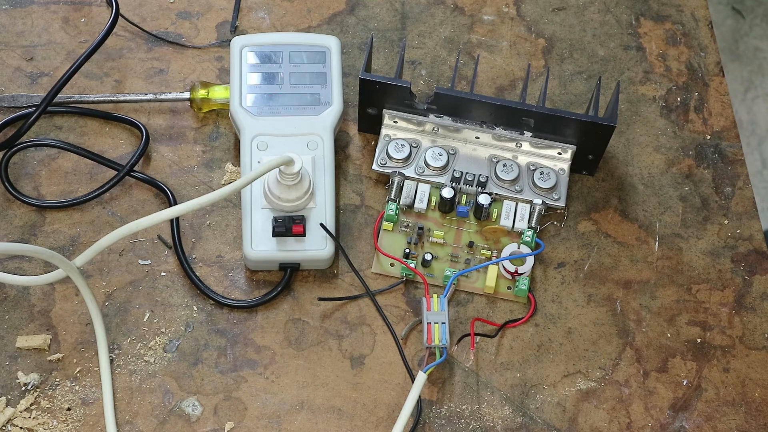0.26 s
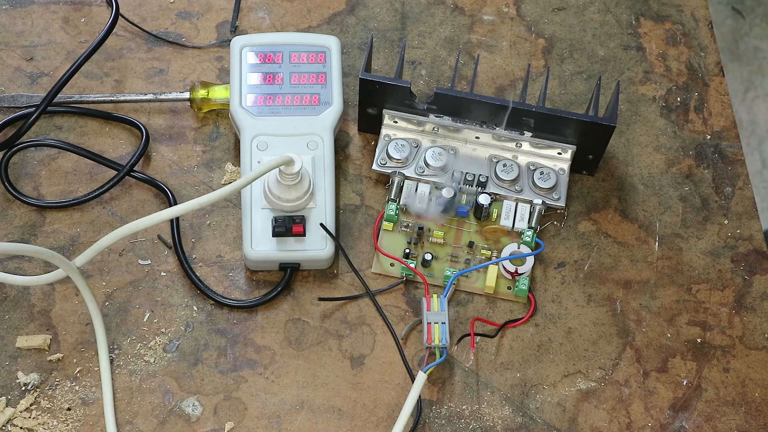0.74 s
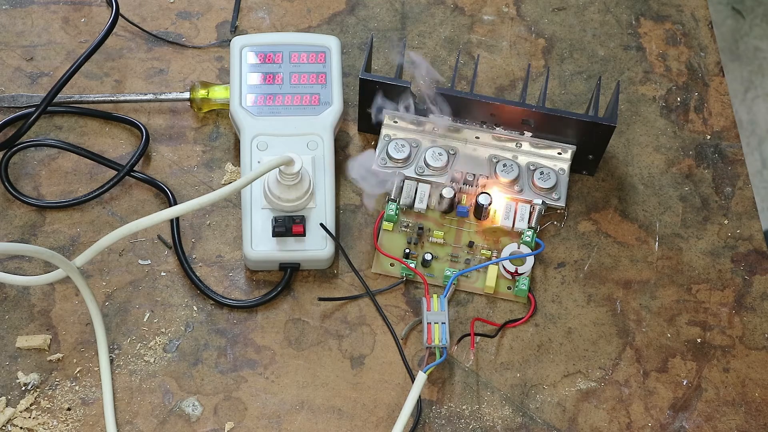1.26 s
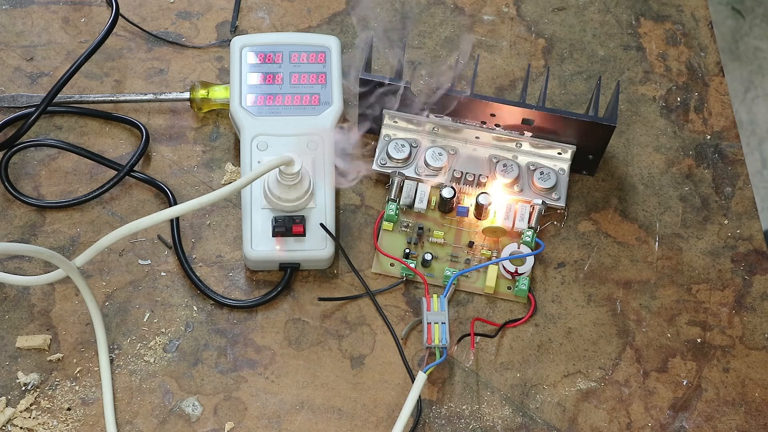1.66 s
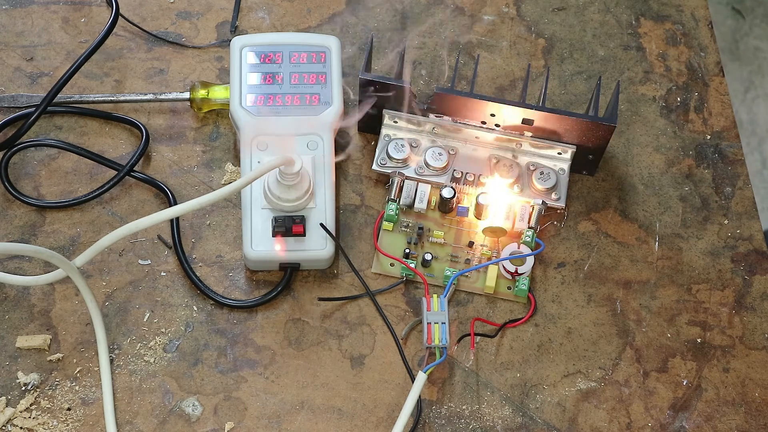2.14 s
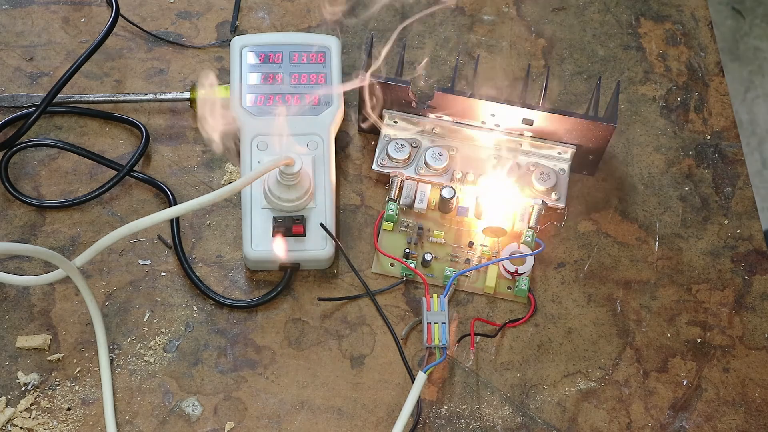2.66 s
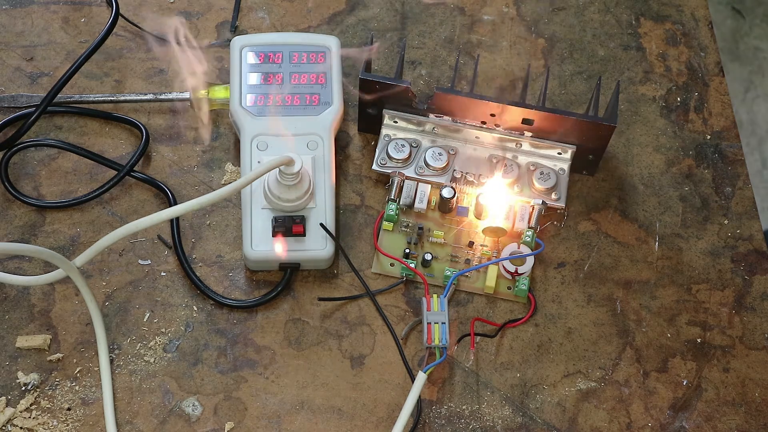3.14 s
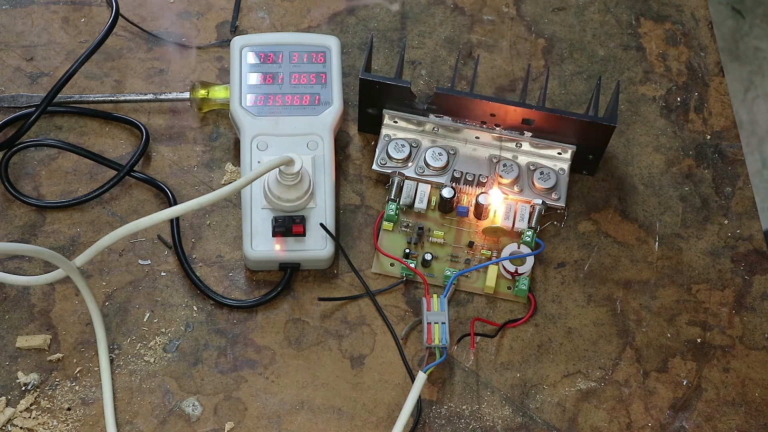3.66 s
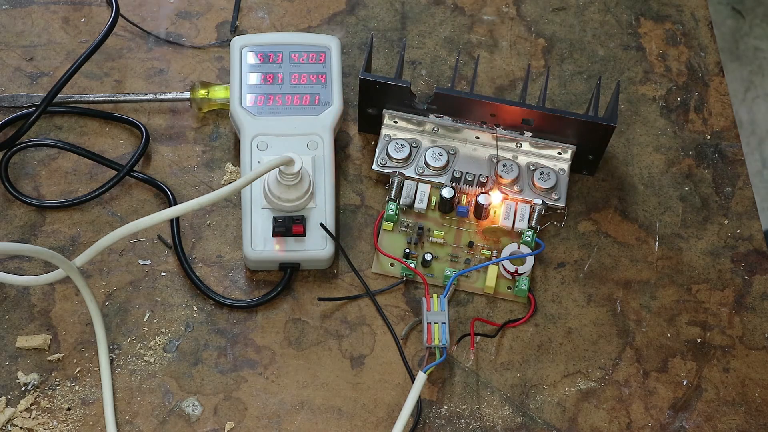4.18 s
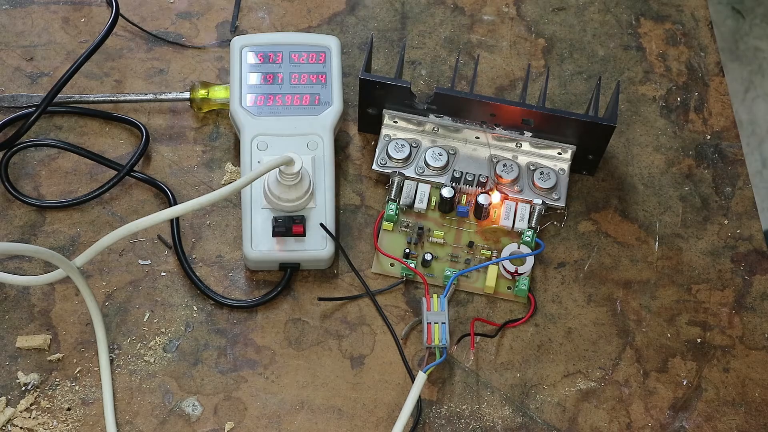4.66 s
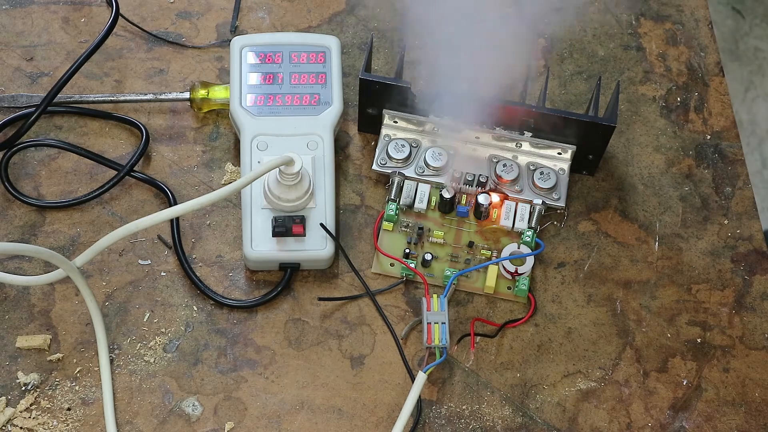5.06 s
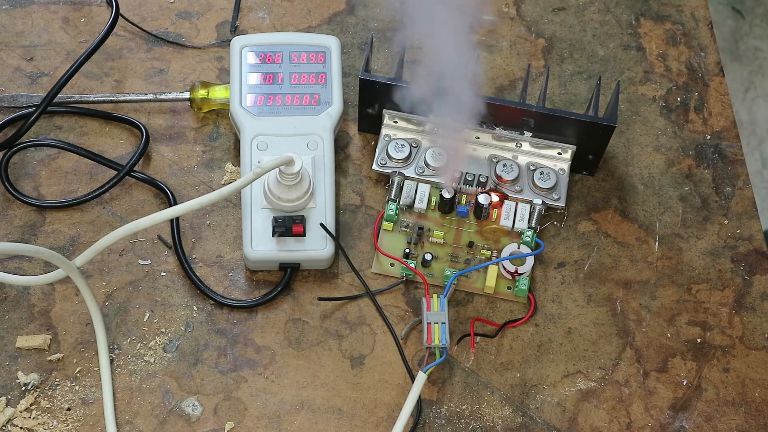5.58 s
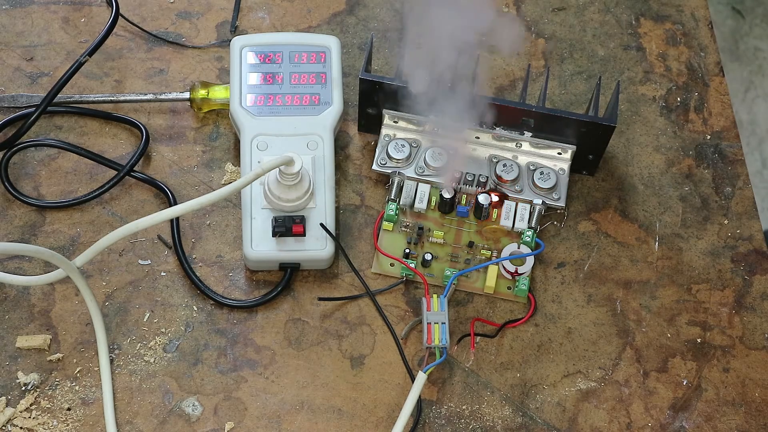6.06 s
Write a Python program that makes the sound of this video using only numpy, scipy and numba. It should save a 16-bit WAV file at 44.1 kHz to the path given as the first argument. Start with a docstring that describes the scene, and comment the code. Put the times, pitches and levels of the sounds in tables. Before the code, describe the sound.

Quiet room hiss, then buzzing electrical sizzle and snapping pops, a lull with soft flame hum, a brief whistle, and one violent explosive crack.

```python
"""Amplifier board burning on a workshop bench

Close and central on a wooden bench in a small workshop, a part sizzles on the mains peaks and pops as gas breaks out.
Filtered noise makes its flame, which sinks to a low fluttering hum; a capacitor whistles (a wavering sine) and bursts.
The bang, a shock with debris and a push of gas, leaves the heat sink ringing in decaying sines.
It overloads the microphone's gain control, which ducks and slowly recovers; rumble and hiss lie wide behind."""
import sys
import numpy as np
from scipy import signal
from scipy.fft import rfft, irfft, next_fast_len
from scipy.io import wavfile
from scipy.ndimage import map_coordinates
from numba import njit

SR = 44100
rng = np.random.default_rng(int(sys.argv[2]) if len(sys.argv) > 2 else 0)


def put_to_file(sound):
    """Save the sound as 16-bit audio at rate SR, in the file named by the first command-line argument."""
    columns = np.atleast_2d(sound).T  # one column per channel
    safe = np.clip(columns, -1, 1)
    whole_steps = np.round(safe * 32767)
    wavfile.write(sys.argv[1], SR, whole_steps.astype(np.int16))


N = 278756

MAINS_PEAKS_HZ, MAINS_LEAD_S = 100, .0005
# The part lights, boils fully and runs dry; the capacitor blows.
IGNITE_S, BOIL_S, SPENT_S, BURST_S = 1.17, 1.627, 3.3, 5.1438

# The pops that stand out, close to the microphone; pops() trims the levels.
# Each row: start in seconds, then nominal levels of crack, gas puff and spit in dB.
LOUD_POPS = [(1.228, -49, -47.5, -79), (1.2328, -67, -42.5, -77), (1.369, -53, -55.5, -62.5),
             (1.4498, -58, -58, -72), (1.4896, -47.5, -53.5, -65), (1.528, -45, -55.5, -53.5),
             (1.6295, -50, -75, -51.5), (1.699, -46, -53, -51.5), (1.7298, -48, -43, -60),
             (1.829, -49.5, -53.5, -57), (1.9875, -51.5, -60.5, -62), (2.0098, -41, -44, -49),
             (2.1285, -51.5, -60.5, -58), (2.2692, -37.5, -41, -51.5), (2.3299, -39.5, -44.5, -51.5),
             (2.3689, -37, -55.5, -55), (2.5185, -52.5, -64, -61), (2.6295, -38, -40, -49),
             (2.6718, -39.5, -45.5, -56), (2.7314, -45, -45, -55.5), (2.8304, -34.5, -38, -52),
             (2.8505, -26, -38, -46), (3.1286, -34.5, -70, -38), (3.53, -49, -71, -58),
             (4.4125, -59, -64.5, -62)]
# Spectra of the crack, the puff and the spit. Each row: frequency in Hz, density in dB per Hz (relative).
CRACK_SPECTRUM = [(40, -27), (300, -4), (750, 1), (1050, -1.5), (1500, 5), (2500, -11.5), (4000, -13),
                  (5500, -15), (8000, -19), (16000, -60.5)]
PUFF_SPECTRUM = [(25, -27), (70, -13.5), (150, -2.5), (300, 1.5), (650, -2), (1400, -13.5), (2600, -20),
                 (6000, -66), (16000, -92)]
SPIT_SPECTRUM = [(300, -13), (2000, 4.5), (3500, -4.5), (4600, 7), (6000, -4.5), (9800, 4.5), (11500, -13),
                 (16000, -27)]


def pops(walls):
    """Each pocket of gas breaks with a crack, pushes out a slower puff and spits; the board rings along."""
    out = np.zeros(N)
    echo = amp(-8) * walls
    for s, crack_db, puff_db, spit_db in [*LOUD_POPS, *small_pops()]:
        # with little crack the gas leaves slowly: a longer, deeper thud
        softness = np.clip(amp(.5 * (puff_db - crack_db)), .7, 1.8)
        thud = [(hz / softness, db) for hz, db in PUFF_SPECTRUM]
        add(out, s, pulse(CRACK_SPECTRUM, crack_db - 4.0, echo, scatter=0.63, life_s=0.00067))
        add(out, s, pulse(thud, puff_db - .5, echo, scatter=0.15, life_s=0.0029 * softness))
        add(out, s, pulse(SPIT_SPECTRUM, spit_db - 0.5, echo, scatter=0.088, life_s=0.0029))
    return board(out, ring_db=1.5)


SMALL_POPS_PER_S, SMALL_SPREAD_DB = 11, 2.5  # mean rate, and random spread of each level
# Lesser pops at the same spot. One row: mean nominal levels of crack, gas puff and spit in dB.
SMALL_POP_LEVELS = (-57, -59, -65)


def small_pops():
    """Lesser pops: from ignition until the part is spent, a few of the mains peaks set one off."""
    peaks_s = np.arange(round(N / SR * MAINS_PEAKS_HZ)) / MAINS_PEAKS_HZ - MAINS_LEAD_S
    levels_db = np.array(SMALL_POP_LEVELS) + SMALL_SPREAD_DB * rng.standard_normal((len(peaks_s), 3))
    # pockets fill at an uneven pace, and each whole unit of gas breaks out
    gas = np.cumsum(2 * rng.random(len(peaks_s))) * SMALL_POPS_PER_S / MAINS_PEAKS_HZ
    full = np.diff(np.floor(gas), prepend=0) > 0
    burning = (peaks_s > IGNITE_S) & (peaks_s < SPENT_S)
    return np.column_stack([peaks_s, levels_db])[full & burning]


SIZZLE_DB, SIZZLE_GROWS_DB_PER_S = -60.5, 0.9  # on reaching the boil, and from then on
SIZZLE_RISE_DB_PER_S, SIZZLE_FALL_DB_PER_S = 47, 29
FLAME_DB, FLAME_GROWS_DB_PER_S, FLAME_SINKS_DB_PER_S = -64.5, 1.5, 2.5  # mean level when the part is spent
FLAME_EDGE_DB_PER_S = 150  # how fast it catches and is blown out
SPURT_EDGE_DB_PER_S = 202
# Spurts of extra sizzle from the part. Each row: start in seconds, end in seconds, level in dB.
SIZZLE_SPURTS = [(3.16, 3.292, -54), (4.412, 4.43, -65.5), (6.26, 6.319, -72)]
# Spectra of the sizzle and the flame. Each row: frequency in Hz, density in dB per Hz (relative).
SIZZLE_SPECTRUM = [(100, -27), (400, -10.5), (900, -6.5), (1200, -4), (1600, 3.5), (2100, -11),
                   (2700, -12.5), (3600, -18), (4800, -6.5), (5700, -17), (7500, -11), (9800, -14.5),
                   (11200, -25.5), (16000, -29)]
FLAME_SPECTRUM = [(30, -12), (90, -4), (220, -6), (500, -1), (900, -4), (1600, -7), (2400, -12.5),
                  (6000, -19.5), (16000, -38)]


def burn(walls):
    """Boiling resin crackles in tiny grains, most strongly on each mains peak, over the soft rush of the flame."""
    t = np.arange(N) / SR
    sizzle_db = SIZZLE_DB + SIZZLE_GROWS_DB_PER_S * (t - BOIL_S)
    sizzle_db = sizzle_db + swell(BOIL_S, SPENT_S - .08, SIZZLE_RISE_DB_PER_S, SIZZLE_FALL_DB_PER_S)
    spurts = sum(amp(db + swell(start, end, SPURT_EDGE_DB_PER_S, SPURT_EDGE_DB_PER_S))
                 for start, end, db in SIZZLE_SPURTS)
    flame_db = FLAME_DB + swell(SPENT_S, SPENT_S, FLAME_GROWS_DB_PER_S, FLAME_SINKS_DB_PER_S)
    flame_db = flame_db + swell(IGNITE_S, BURST_S, FLAME_EDGE_DB_PER_S, FLAME_EDGE_DB_PER_S)

    current = np.cos(np.pi * MAINS_PEAKS_HZ * (t + MAINS_LEAD_S)) ** 4  # one hump per mains peak
    sparks = rng.random(N) < 1800 / SR * (.3 + current)
    size_db = 4.5 * np.minimum(rng.exponential(size=N), 3)
    grain_gain = amp(size_db + 1.4 * wobble(60)) * (0.73 + current)
    grains = sparks * rng.choice([-1, 1], N) * grain_gain
    grains = grains + amp(1.5) * signal.fftconvolve(grains, walls)[:N]

    sizzle = unit(coloured(grains, SIZZLE_SPECTRUM))
    flame = unit(coloured(rng.standard_normal(N), FLAME_SPECTRUM))
    return np.hypot(amp(sizzle_db), spurts) * sizzle + amp(flame_db + 1.2 * wobble(6.2)) * flame


# The bang's cracks and close echoes. Each row: delay after the burst in seconds, level in dB re the shock's peak.
BURST_DEBRIS = [(.0009, -12.5), (.0037, -6.5), (.0044, -11), (.0052, -13.5), (.0074, -4.5), (0.0164, -14.5)]
# Spectrum of the bang. Each row: frequency in Hz, density in dB per Hz (relative).
BLAST_SPECTRUM = [(20, -18.5), (70, -4), (230, 1), (450, -0.5), (800, 0.5), (1200, -2), (1700, -1.5),
                  (2600, -9.5), (4000, -13), (7500, -10), (10000, -13), (16000, -25)]


def burst():
    """The capacitor blows: a shock wave, tearing foil, flying pieces and a slower push of gas."""
    out = np.zeros(N)
    t = np.arange(SR // 2) / SR
    shock = .12 * rng.standard_normal(len(t)) * np.exp(-(t / 0.011) ** 2)
    shock[0] += 1
    for delay, db in BURST_DEBRIS:
        add(shock, delay, amp([db]))
    tail = workshop(size=len(t), build_s=0.0037)
    shock = shock / np.linalg.norm(shock) + amp(-2.5) * tail
    u = t / 0.00082
    gas = (1 - u) * np.exp(-u)  # overpressure, then a longer suction
    bang = board(coloured(shock, BLAST_SPECTRUM), ring_db=3.0)
    add(out, BURST_S, amp(37) * bang + amp(20.5) * gas)
    return out


VENT_HZ, VENT_DB, VENT_GROWS_DB_PER_S = 1240, -62, 69  # mean pitch, mean level at the burst, swell before it


def vent():
    """Gas whistles through the capacitor's seal, louder as the pressure builds, until it bursts."""
    wait_s = BURST_S - np.arange(N) / SR
    level_db = VENT_DB - VENT_GROWS_DB_PER_S * np.abs(wait_s)
    return (wait_s > 0) * tone(VENT_HZ, level_db, waver=.0022, flicker_db=2.5)


FLUTTER_HZ, FLUTTER_CLIMB_HZ_PER_S = 72.5, 6  # mean pitch when the part is spent, and its climb
FLUTTER_RISE_DB_PER_S, FLUTTER_FALL_DB_PER_S = 28, 110
# Spells of flutter in the sinking flame. Each row: start in seconds, end in seconds, mean level in dB.
FLUTTER_SPELLS = [(3.68, 3.95, -72), (4.11, 4.152, -73)]


def flutter():
    """The sinking flame hums in spells, a little higher as it shrinks."""
    hz = FLUTTER_HZ + FLUTTER_CLIMB_HZ_PER_S * (np.arange(N) / SR - SPENT_S)
    spells_db = [db + swell(start, end, FLUTTER_RISE_DB_PER_S, FLUTTER_FALL_DB_PER_S)
                 for start, end, db in FLUTTER_SPELLS]
    return tone(hz, np.max(spells_db, axis=0), waver=0.013, flicker_db=2.5)


# Ringing fins on the board. Each row: frequency in Hz, starting level in dB (peak), decay time T60 in seconds.
HEAT_SINK_MODES = [(1790, -58, 1.1), (1859, -59.5, 1.1), (2300, -64.5, 1.0)]


def heat_sink():
    """The fins, struck by the blast, ring faintly for longer than the room."""
    out = np.zeros(N)
    t = np.arange(SR) / SR
    for hz, db, t60 in HEAT_SINK_MODES:
        add(out, BURST_S, amp(db - 60 * t / t60) * np.sin(2 * np.pi * hz * t))
    return out


SWITCH_S, SWITCH_DB = 0.0712, -63.5


def switch_on(walls):
    """A thin, faint tick as the current starts."""
    out = np.zeros(N)
    add(out, SWITCH_S, pulse(SPIT_SPECTRUM, SWITCH_DB, amp(-3) * walls, scatter=.15, life_s=.002))
    return out


# Rumble around the microphone. Each row: frequency in Hz, density in dB per Hz (relative).
FLOOR_SPECTRUM = [(20, -12), (40, -4.5), (70, -1.5), (130, -2), (220, -4.5), (350, -2), (500, -4),
                  (750, -2.5), (1100, -6), (1600, -7.5), (2000, -14.5), (4000, -22), (16000, -32.5)]
# Spread of the rumble. Each row: frequency in Hz, side minus mid in dB.
FLOOR_WIDTH = [(60, -3.5), (180, 5), (550, 3.5), (1650, -2.5), (4970, 7.5), (15000, -2)]


def room_tone():
    """The quiet rumble of the workshop arrives from all sides, as independent mid and side noise."""
    mid = unit(coloured(rng.standard_normal(N), FLOOR_SPECTRUM))
    side = coloured(unit(coloured(rng.standard_normal(N), FLOOR_SPECTRUM)), FLOOR_WIDTH)
    return amp(-67.0) * np.array([mid + side, mid - side])


# Colour of the workshop's echo. Each row: frequency in Hz, starting level in dB (relative).
ROOM_SPECTRUM = [(40, -29.5), (150, -14), (350, -2.5), (570, -3), (1000, -1), (1700, -2), (2500, 5),
                 (3500, 4.5), (5000, -0.5), (9500, -5), (11500, -9), (16000, -11)]
# How long the workshop rings. Each row: frequency in Hz, decay time T60 in seconds.
ROOM_DECAY = [(100, .17), (600, .215), (2000, .22), (6000, .23), (9500, .24), (15000, .21)]


def workshop(size, build_s):
    """A diffuse tail of energy 1 that builds up as the walls answer and decays at its own pace per frequency."""
    hz, t, z = signal.stft(rng.standard_normal(size), SR, nperseg=256)
    gain = amp(along(ROOM_SPECTRUM, hz)[:, None] - 60 * t / along(ROOM_DECAY, hz)[:, None])
    tail = signal.istft(z * gain, SR, nperseg=256)[1][:size]
    tail = tail * (1 - np.exp(-(np.arange(size) / SR / build_s) ** 2))
    return tail / np.linalg.norm(tail)


# Resonances of board and heat sink. Each row: frequency in Hz, width in Hz, level in dB before ring_db is added.
BOARD_MODES = [(415, 20, -12), (560, 70, -12.5), (945, 60, -8.5), (1255, 110, -9), (1480, 99, -0.5),
               (1787, 90, 2.5), (2605, 250, -10), (7330, 480, -11)]


def board(x, ring_db):
    """x plus the short ring that it starts in the board, a sum of band-pass resonances."""
    m = 2 * next_fast_len(len(x) // 2 + 2048)
    f = np.fft.rfftfreq(m, 1 / SR)
    ring = sum(amp(db) * 1j * f * w / (c * c - f * f + 1j * f * w) for c, w, db in BOARD_MODES)
    return irfft(rfft(x, m) * (1 + amp(ring_db) * ring))[:len(x)]


def pulse(spectrum, db, walls, scatter, life_s):
    """A pressure pulse with a turbulent wake, then the walls' answer; db is the direct level over 6 ms."""
    t = np.arange(len(walls)) / SR
    window = .006 * SR
    push = scatter * rng.standard_normal(len(t)) * np.exp(-t / life_s)
    push[0] -= 1
    add(push, .0022, np.array([.3]))  # the bench echoes it at once
    push /= np.linalg.norm(push)
    direct = coloured(push[:1024], spectrum)
    return amp(db) * coloured(push + walls, spectrum) * np.sqrt(window / np.sum(direct ** 2))


def tone(hz, db, waver, flicker_db):
    """An unsteady note of streaming gas: a sine whose pitch and level wander."""
    phase = 2 * np.pi * np.cumsum(hz * (1 + waver * wobble(28))) / SR
    return np.sqrt(2) * amp(db + flicker_db * wobble(18)) * np.sin(phase)


def swell(start_s, end_s, rise_db_per_s, fall_db_per_s):
    """Envelope in dB: climbs to 0 at the start, holds, falls after the end."""
    t = np.arange(N) / SR
    return -rise_db_per_s * np.maximum(start_s - t, 0) - fall_db_per_s * np.maximum(t - end_s, 0)


def wobble(rate):
    """A smooth random curve, rate knots a second."""
    return map_coordinates(rng.standard_normal(int(N * rate / SR) + 4), [np.arange(N) * rate / SR])


def coloured(x, spectrum):
    """Causal (minimum-phase) filter with the given spectrum."""
    m = 2 * next_fast_len(len(x) // 2 + 1024)
    cepstrum = irfft(np.log(amp(along(spectrum, np.fft.rfftfreq(m, 1 / SR)))))
    # fold the cepstrum onto positive time
    cepstrum[1:m // 2] *= 2
    cepstrum[m // 2 + 1:] = 0
    return irfft(rfft(x, m) * np.exp(rfft(cepstrum)))[:len(x)]


def along(points, hz):
    """Interpolate (Hz, value) points on a log frequency axis."""
    f, v = np.transpose(points)
    return np.interp(np.log(hz + 1), np.log(f + 1), v)


def add(track, s, x):
    """Mix x into the track at time s."""
    part = track[round(s * SR):][:len(x)]
    part += x[:len(part)]


def amp(db):
    """Decibels to amplitude."""
    return 10 ** (np.asarray(db) / 20)


def unit(x):
    """Scale x to an RMS of 1."""
    return x / np.sqrt(np.mean(x ** 2) + 1e-20)


def scene():
    """The board is close, central and still, so its crackles share one echo; rumble and hiss are stereo."""
    walls = workshop(size=8192, build_s=0.0067)
    hiss = amp(-62) * rng.standard_normal((2, N))
    background = hiss + room_tone()
    fire = switch_on(walls) + burn(walls) + flutter()
    capacitor = vent() + burst() + heat_sink()
    return background + fire + capacitor + pops(walls)


@njit
def ducking(excess_db, attack, recovery_db):
    """Gain reduction in dB: chases an overload quickly and lets go at a steady pace."""
    cut, now = np.zeros(len(excess_db)), 0.
    for i in range(len(excess_db)):
        if excess_db[i] > now:
            now += (excess_db[i] - now) * attack
        else:
            now = max(now - recovery_db, 0.)
        cut[i] = now
    return cut


TOP_HZ = 15850  # upper band limit


def record(dry):
    """Gain control shared by both channels, then overload of the converter and the band limit."""
    level_db = 20 * np.log10(np.abs(dry).max(axis=0) + 1e-9)
    excess_db = np.clip(level_db + 17.5, 0, 15)
    # 6 ms attack, 9.5 dB per second recovery
    x = dry * amp(-ducking(excess_db, 1 / (.006 * SR), 9.5 / SR))
    x = x / (1 + np.abs(x / .95) ** 6) ** (1 / 6)  # saturates towards .95
    m = next_fast_len(N + 4096)
    passband = .5 - .5 * np.tanh((np.fft.rfftfreq(m, 1 / SR) - TOP_HZ) / 70)
    return irfft(rfft(x, m) * passband, m)[:, :N]


dry = scene()
out = record(dry)
put_to_file(out)
```